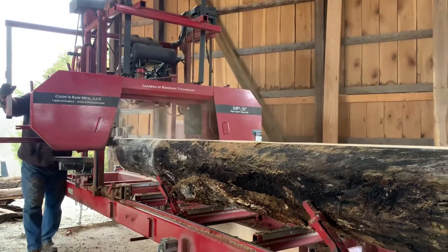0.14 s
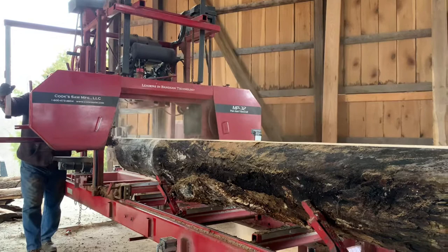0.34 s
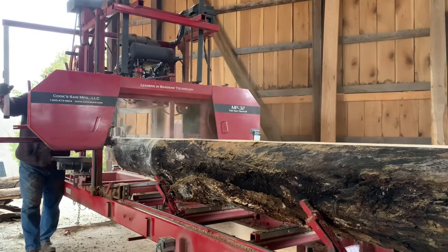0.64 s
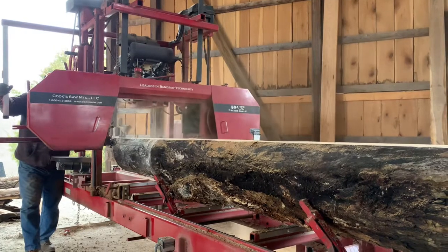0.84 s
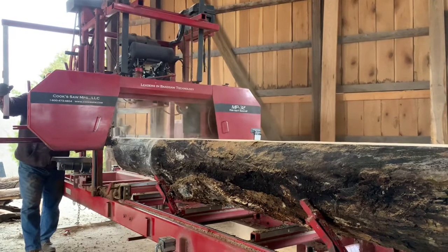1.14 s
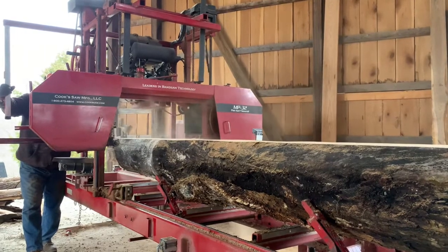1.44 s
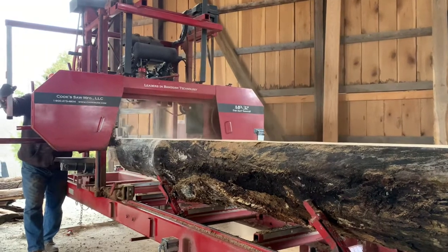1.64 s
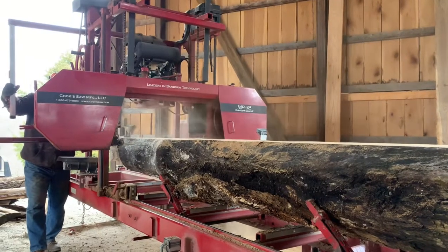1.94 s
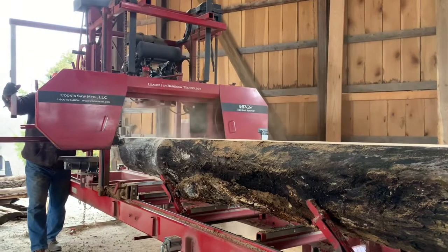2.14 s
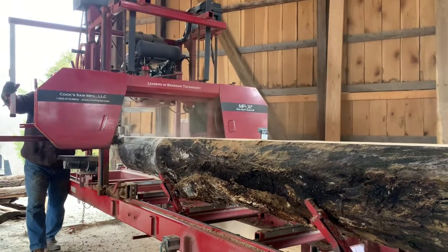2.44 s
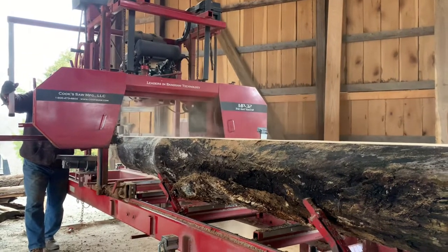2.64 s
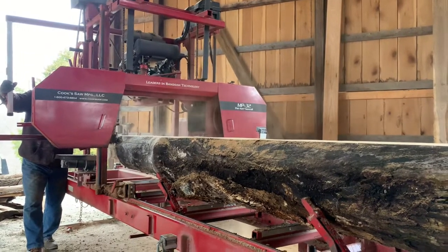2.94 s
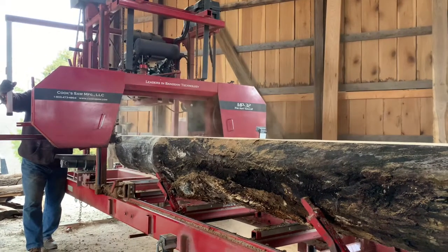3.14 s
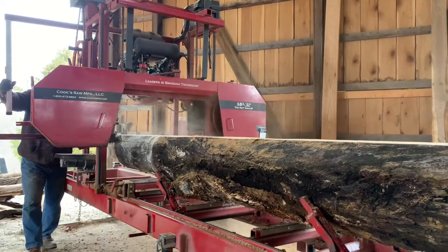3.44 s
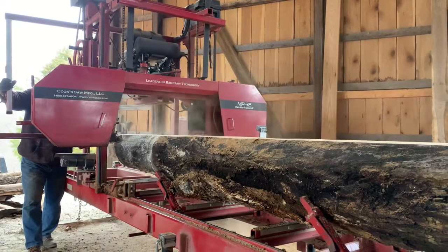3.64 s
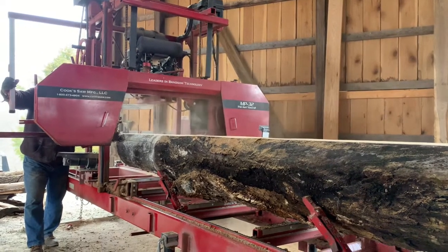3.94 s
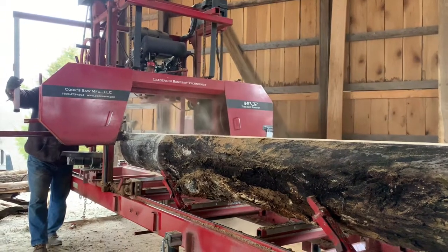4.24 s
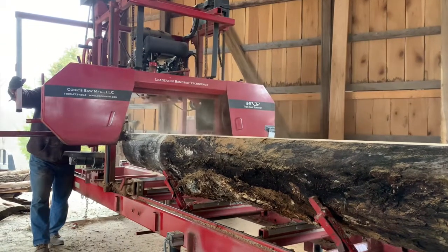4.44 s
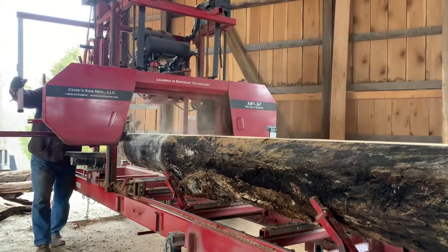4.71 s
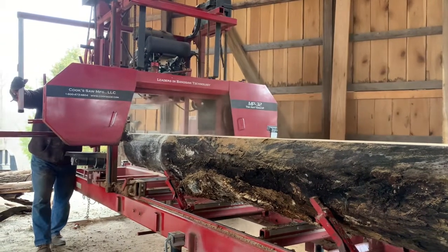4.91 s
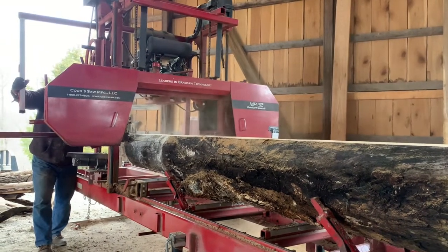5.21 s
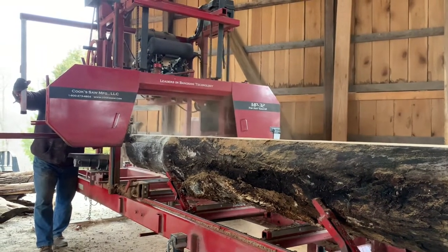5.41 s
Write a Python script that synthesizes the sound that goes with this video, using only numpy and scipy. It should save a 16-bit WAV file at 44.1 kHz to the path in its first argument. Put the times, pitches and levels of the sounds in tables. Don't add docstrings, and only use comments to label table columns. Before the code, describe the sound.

Continuous sawmill noise, close and dense: throaty engine drone with a governor that keeps hunting, rough intake and frame roar, and a sharp, sizzling blade hiss from the log. A steady low motor hum sits slightly right. The roar and cut shift only a little, growing marginally stronger late on. Narrow low end, wider hiss, open barn, small stereo microphone with a slightly processed top end.

```python
import sys
import numpy as np
from scipy import signal
from scipy.fft import rfft, irfft, next_fast_len
from scipy.io import wavfile
from scipy.ndimage import uniform_filter1d

SR = 44100
rng = np.random.default_rng(int(sys.argv[2]) if len(sys.argv) > 2 else 0)


def nominal_scale(level):
    x = np.asarray(level, float) / 20
    return 10 ** x


def generate_wav(signal):
    frames = np.transpose(np.atleast_2d(signal))
    scaled = np.clip(frames, -1, 1) * 32767
    pcm = np.round(scaled).astype(np.int16)
    wavfile.write(sys.argv[1], SR, pcm)


N = 245617
SIZE = next_fast_len(N + 4096)
BINS_HZ = np.arange(SIZE // 2 + 1) * SR / SIZE + 1e-3


def rms_one(x):
    return x / np.sqrt(np.mean(x ** 2) + 1e-20)


def in_time(rows):
    time_s, *columns = np.transpose(rows)
    return [np.interp(np.arange(N) / SR, time_s, column) for column in columns]


def per_bin(points):
    hz, value = np.transpose(points)
    return np.interp(np.log(BINS_HZ), np.log(hz + 1), value)


def drift(rate_hz):
    step, settle = 40, 4000
    pole = np.exp(-2 * step * np.pi * rate_hz / SR)
    noise = rng.standard_normal(N // step + settle + 2)
    slow = signal.lfilter([1], [1, -2 * pole, pole * pole], noise)[settle:]
    return np.interp(np.arange(N) / step, np.arange(len(slow)), rms_one(slow))


def coloured(beat, spectrum, patchy_db, rate_hz):
    # (frequency [Hz], width [Hz], level over the noise [dB])
    ring_modes = [(217, 10, 7), (190, 14, -4), (320, 30, 3), (480, 30, -3), (440, 25, 3), (570, 30, 3),
                  (670, 16, 3), (953, 11, 9), (1005, 20, 3), (1220, 60, 3), (1570, 30, 3), (1700, 50, 3),
                  (1960, 90, 3), (2370, 120, 3), (2810, 60, 5), (3310, 90, 2), (4100, 80, -5),
                  (4380, 60, 4), (5500, 500, 1.5), (4960, 95, 4), (7300, 90, 2.5), (8050, 90, 3),
                  (9550, 120, 2.5)]
    noise = rng.standard_normal((3, N))
    noise[0] *= rms_one(beat)
    rings_db = sum(db / (1 + (2 * (BINS_HZ - hz) / width_hz) ** 2) for hz, width_hz, db in ring_modes)
    shaped = rfft(noise, SIZE) * nominal_scale(per_bin(spectrum) + rings_db)
    place = np.clip(2 * np.log2(BINS_HZ / 150), 0, 13)
    out = 0
    for band in range(14):
        fade = np.clip(1 - abs(place - band), 0, 1)
        out = out + nominal_scale(patchy_db * drift(rate_hz)) * irfft(shaped * fade, SIZE)[:, :N]
    return rms_one(out)


def throttle(cycle_hz):
    # (order, level [dB], slope [dB/Hz], bend [dB/Hz^2], pick-up [dB/(Hz/s)])
    main_orders = [(4, -45, -6.1, -4, 0.5), (5, -32.5, -3.5, -13, 0.57), (6, -38.5, -6.4, -2.6, 0.4)]
    lag_s, firing_wobble_db = 0.28, 1.1
    fast_hz = cycle_hz - 28.1
    smooth_hz = uniform_filter1d(cycle_hz, size=int(lag_s * SR), mode="nearest")
    pick_up = np.gradient(smooth_hz) * SR
    return [db + slope * fast_hz + bend * fast_hz ** 2 + push * pick_up + firing_wobble_db * drift(3.5)
            for _, db, slope, bend, push in main_orders]


def exhaust(cycle_hz, *main_db):
    # (order, level [dB], slope [dB/Hz], wobble [dB])
    other_orders = [(1, -72, 0, .6), (2, -51, 3.5, .8), (3, -42, 4.0, .8), (7, -56, 0, 3.0),
                    (8, -45, 3.0, 3.5), (9, -45, -3.0, 3.0), (10, -51, 0, 4.0), (11, -49, 0, 4.0),
                    (12, -51, 0, 4.0), (13, -53, 0, 4.0), (14, -54, 0, 4.0), (16, -52, 0, 4.0)]
    turn = 2 * np.pi * np.cumsum(cycle_hz + .013) / SR + 2.13

    def smear(order):
        return 2.05 - 1.04 * order ** 2

    out = 0
    for order, db in zip((4, 5, 6), main_db):
        out = out + nominal_scale(db) * np.cos(order * turn + smear(order))
    wander = .04 * drift(1.2)
    for order, db, slope, wobble_db in other_orders:
        order = round(order)
        level = nominal_scale(db + slope * (cycle_hz - cycle_hz.mean()) + wobble_db * drift(4.0))
        slip = .3 * (wobble_db - .8) * drift(2.5)
        out = out + level * np.cos(order * (turn + wander) + smear(order) + slip)
    return np.sqrt(2) * out


def roar(cycle_hz, level_db):
    # (frequency [Hz], density [dB/Hz])
    roar_spectrum = [(30, -28), (65, -17), (100, -8), (150, 0), (200, 3), (300, 1.5), (450, 1.5), (520, 1),
                     (720, -3.5), (1000, -3.5), (1300, -2.5), (1800, -7), (2300, -12), (3200, -21)]
    turn = 2 * np.pi * np.cumsum(cycle_hz) / SR
    puffs = nominal_scale(.5 * np.cos(turn) + .6 * np.cos(2 * turn))
    return nominal_scale(level_db + 2.0) * coloured(puffs, roar_spectrum, patchy_db=1.23, rate_hz=4.2)


def blade(cycle_hz, level_db):
    # (frequency [Hz], density [dB/Hz])
    cut_spectrum = [(1800, -30), (2400, -10), (3000, -11), (3600, -13.5), (4200, -15.3), (5000, -11),
                    (6000, -11.6), (7000, -7), (7400, -1.6), (8400, .4), (9500, -2.2), (10200, -3.8),
                    (12900, -4.4), (13400, -6.8), (15800, -8.3)]
    wheel_hz, teeth_hz = 5.33, 368
    travel = 2 * np.pi * np.cumsum(cycle_hz / cycle_hz.mean()) / SR
    teeth = nominal_scale(1.1 * np.cos(teeth_hz * travel + 2.2 * drift(14.0)))
    wheel_db = 0.43 * np.cos(wheel_hz * travel + 0.081)
    wheel_db += 0.28 * np.cos(2 * wheel_hz * travel + .3) + 0.2 * drift(6.0)
    hiss = coloured(teeth, cut_spectrum, patchy_db=0.06, rate_hz=12.0)
    return nominal_scale(level_db + 5.0) * nominal_scale(wheel_db) * hiss


def hum():
    # (multiple, level [dB])
    harmonics = [(1, -55), (2, -38), (3, -60), (4, -54.5), (6, -58), (8, -51.5)]
    motor_hz = 37.598
    turn = 2 * np.pi * motor_hz * np.arange(N) / SR + .1 + np.array([[.075], [-.075]])
    tones = sum(nominal_scale(db + 0.48 * drift(1.5)) * np.cos(round(k) * turn) for k, db in harmonics)
    return np.sqrt(2) * tones * nominal_scale(np.array([[-.75], [.75]]))


def ports(straight, left, right):
    # (frequency [Hz], left lead [half turns])
    left_leads = [(0, 0), (300, .12), (1250, .33), (1500, 1), (1900, 2), (2380, 2.95), (3000, 3.05),
                  (3800, 4.1), (4800, 4), (5400, 3.45), (6000, 4.05), (6400, 3.97), (8520, 3), (15900, 0)]
    # (frequency [Hz], left minus right [dB])
    left_louder = [(100, -1.7), (400, -0.0), (600, 0.8), (800, 2.2), (1100, 1.6), (1500, 0.2), (1800, 0.0),
                   (2300, -1.3), (3000, -0.1), (3600, 3.0), (4300, -0.8), (5200, -3.9), (6000, -1.2),
                   (6600, -0.1)]
    # (frequency [Hz], share [0-1])
    straight_share = [(200, .95), (700, .75), (1000, .78), (1400, .55), (1800, .3), (2000, .6), (2250, .4),
                      (2750, .84), (3500, .25), (4200, .15), (5700, .22), (6400, .86), (7200, .85),
                      (8400, .99)]
    share = np.clip(per_bin(straight_share), 0, 1)
    lead = np.interp(BINS_HZ, *np.transpose(left_leads))
    lead = lead - .1 * np.sin(2 * np.pi * lead) * np.clip(BINS_HZ / 1000 - 7, 0, 1)
    half = np.exp(.5j * np.pi * lead)
    direct = np.sqrt(share) * rfft(straight, SIZE) * [half, 1 / half]
    scattered = np.sqrt(1 - share) * rfft([left, right], SIZE)
    tilt = nominal_scale(per_bin(left_louder) / 2)
    return irfft((direct + scattered) * [tilt, 1 / tilt], SIZE)[:, :N]


def scene():
    # (time [s], cycle rate [Hz])
    engine_speed = [(0.0, 27.84), (0.375, 27.82), (0.5, 28.51), (0.875, 28.78), (1.25, 27.37), (1.5, 27.68),
                    (1.75, 28.57), (2.0, 28.63), (2.375, 27.76), (2.875, 27.84), (3.25, 28.81),
                    (3.375, 28.66), (3.625, 27.82), (4.0, 27.5), (4.375, 28.89), (4.625, 28.63),
                    (5.0, 27.39), (5.57, 28.48)]
    # (time [s], engine roar [dB], cut [dB])
    load = [
        (0.0, -33.5, -32.5),
        (2.03, -34, -32.5),
        (2.62, -33, -32.5),
        (3.55, -33.5, -31.5),
        (3.72, -33.5, -32),
        (4.19, -33, -31.5),
        (4.79, -34, -32),
        (5.32, -33, -31.5),
        (5.57, -32, -32.5),
    ]
    cycle_hz, = in_time(engine_speed)
    roar_db, cut_db = in_time(load)
    paths = roar(cycle_hz, roar_db) + blade(cycle_hz, cut_db)
    paths[0] += exhaust(cycle_hz, *throttle(cycle_hz))
    return ports(*paths) + hum()


def suppressor(x):
    hz, _, cells = signal.stft([x[0] + x[1], x[0] - x[1]], SR, nperseg=1024)
    flicker = uniform_filter1d(rng.standard_normal(cells.shape), size=3, axis=1)
    flicker = uniform_filter1d(flicker, size=4, axis=2)
    depth_db = np.interp(hz, [1200, 3500, 9000, 11000, 15000], [0, 2.6, 2.2, 1.5, 2.8])[:, None]
    gain = nominal_scale(depth_db * rms_one(flicker) - .115 * depth_db ** 2)
    total, gap = signal.istft(cells * gain, SR, nperseg=1024)[1][:, :N]
    return np.array([total + gap, total - gap]) / 2


def roll_off(x):
    return signal.sosfilt(signal.butter(12, 17110, fs=SR, output="sos"), x)


def record(dry):
    top_hz = 15740
    spectrum = rfft(suppressor(dry), SIZE) * (BINS_HZ < top_hz)
    mix = irfft(spectrum, SIZE)[:, :N]
    return roll_off(mix)


dry = scene()
out = record(dry)
generate_wav(out)
```